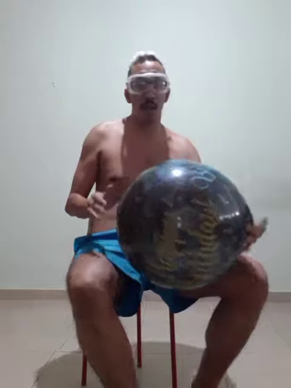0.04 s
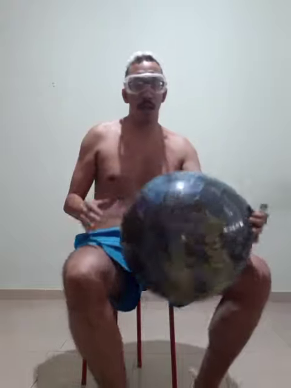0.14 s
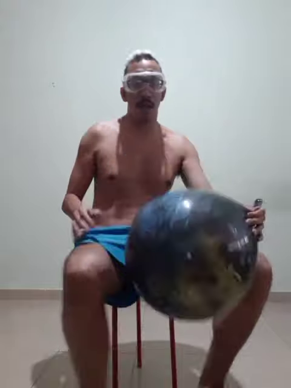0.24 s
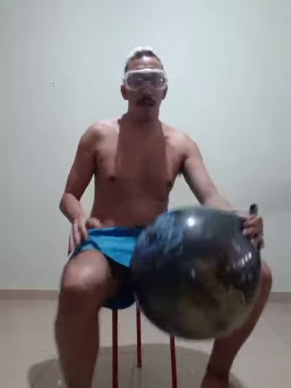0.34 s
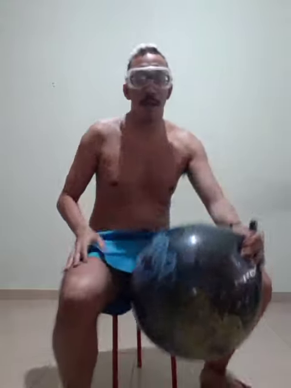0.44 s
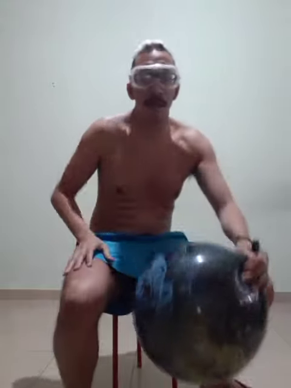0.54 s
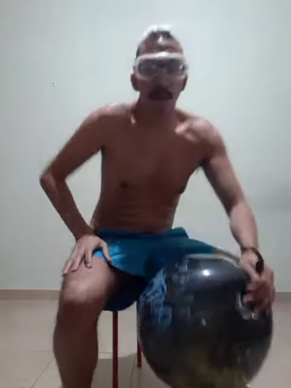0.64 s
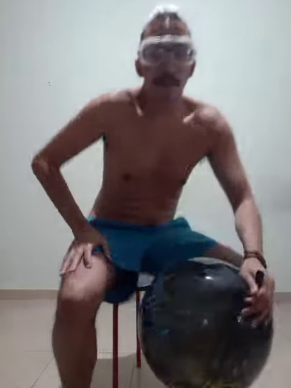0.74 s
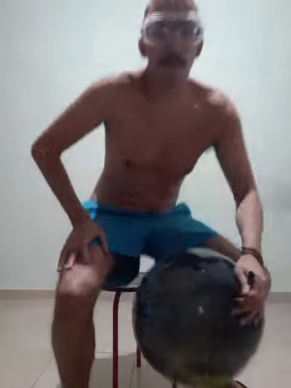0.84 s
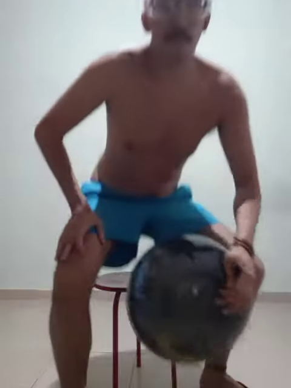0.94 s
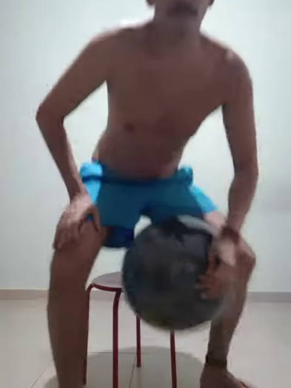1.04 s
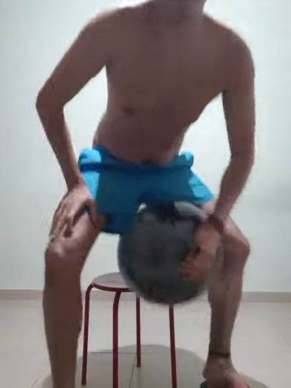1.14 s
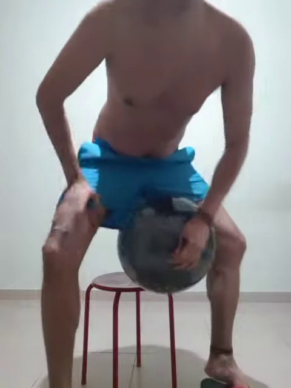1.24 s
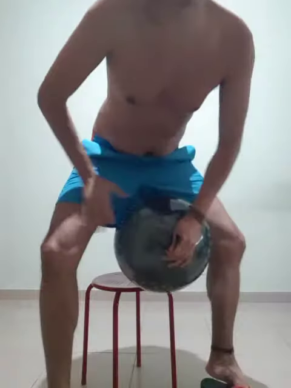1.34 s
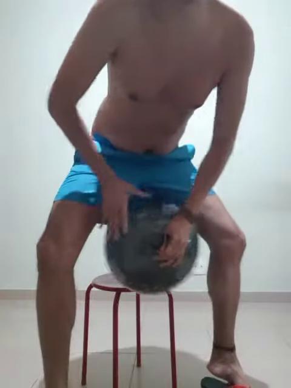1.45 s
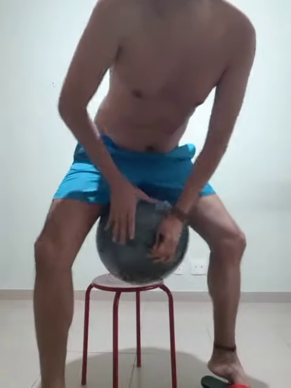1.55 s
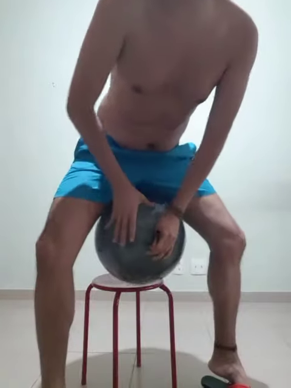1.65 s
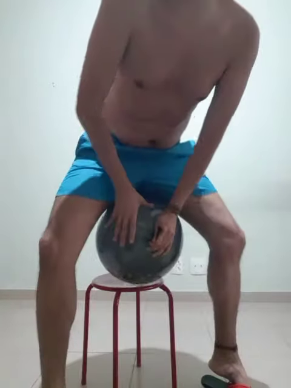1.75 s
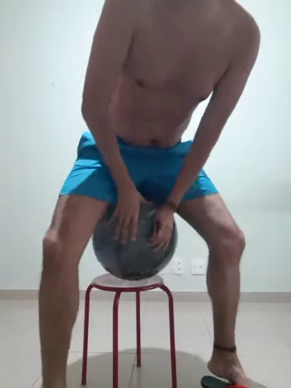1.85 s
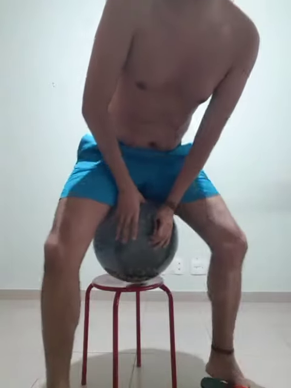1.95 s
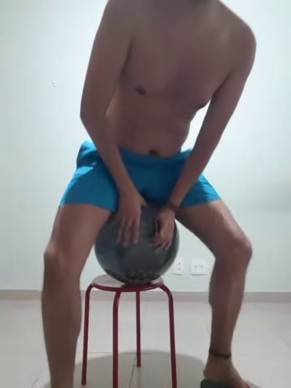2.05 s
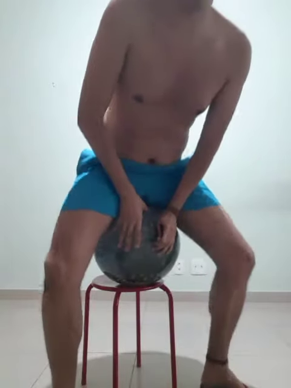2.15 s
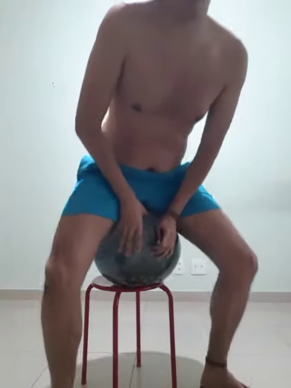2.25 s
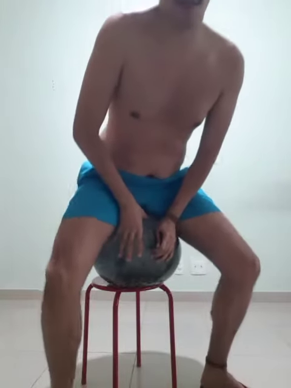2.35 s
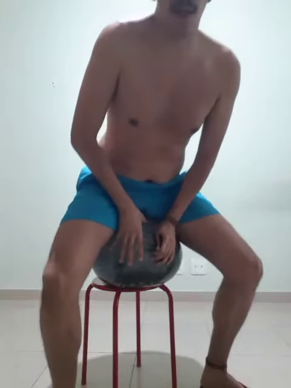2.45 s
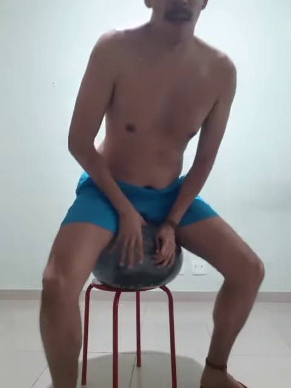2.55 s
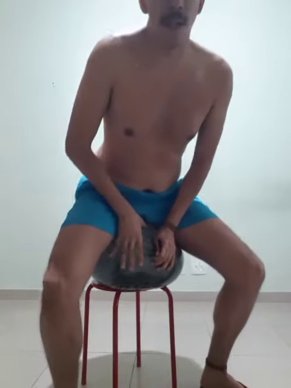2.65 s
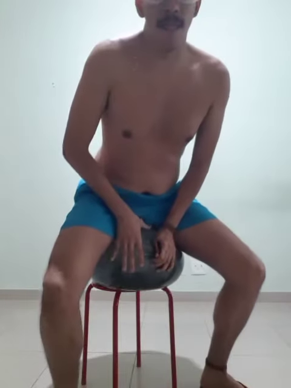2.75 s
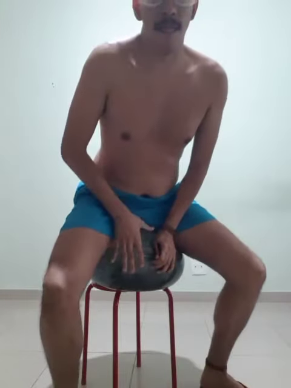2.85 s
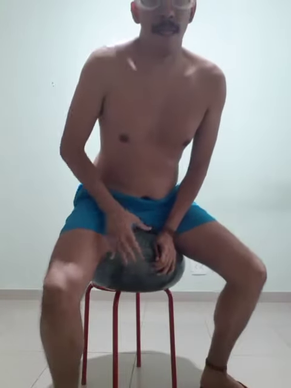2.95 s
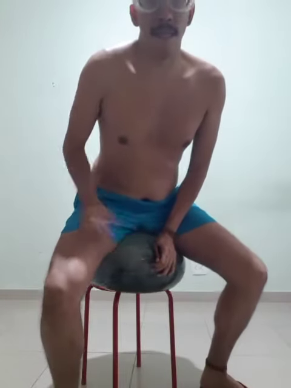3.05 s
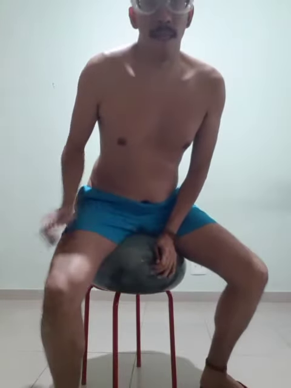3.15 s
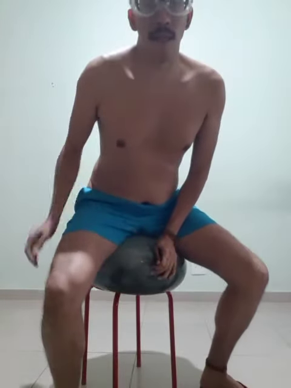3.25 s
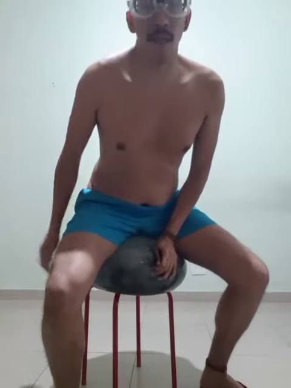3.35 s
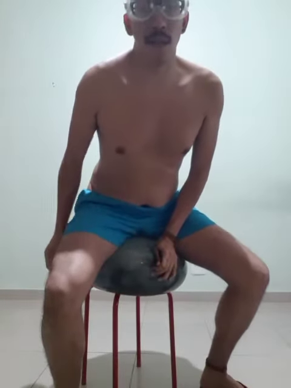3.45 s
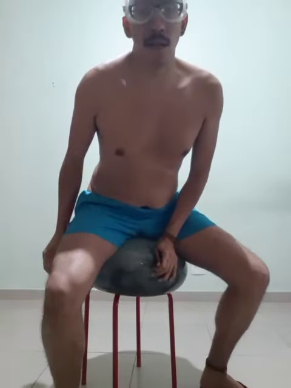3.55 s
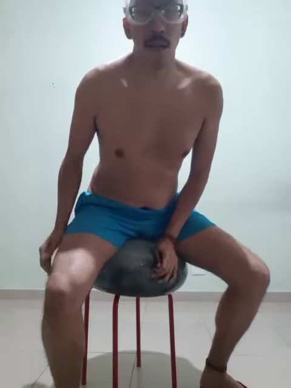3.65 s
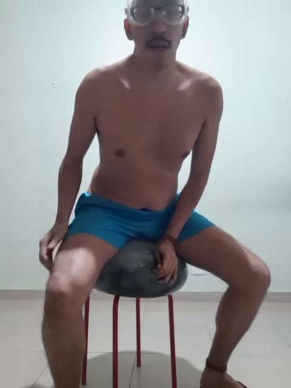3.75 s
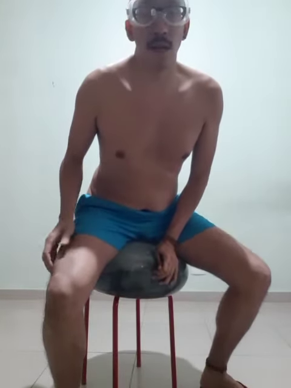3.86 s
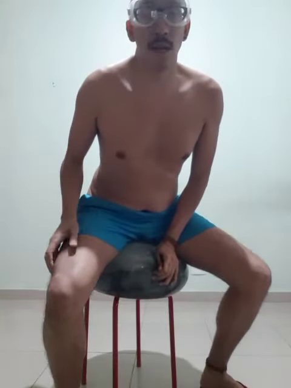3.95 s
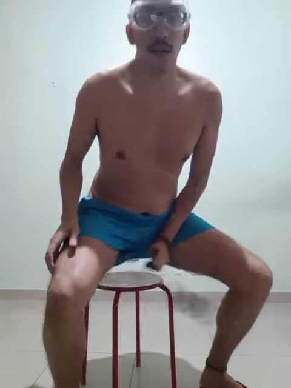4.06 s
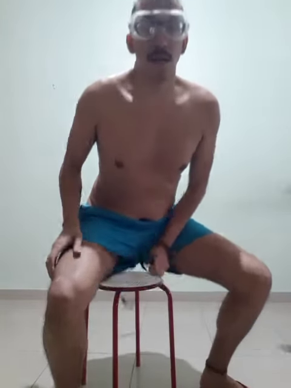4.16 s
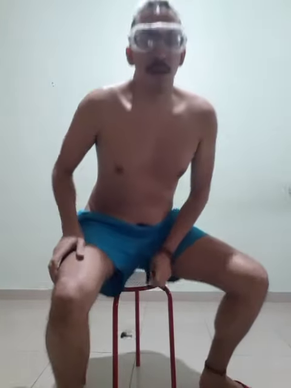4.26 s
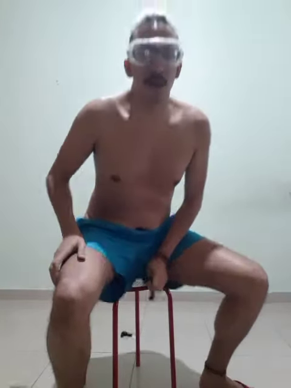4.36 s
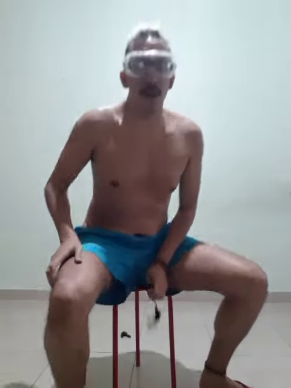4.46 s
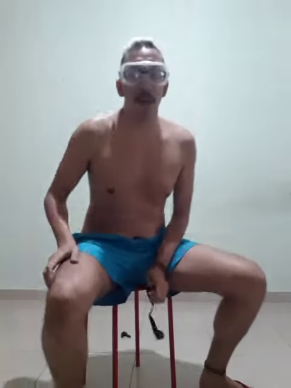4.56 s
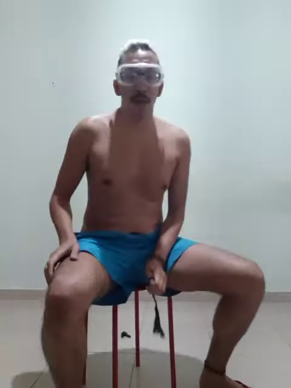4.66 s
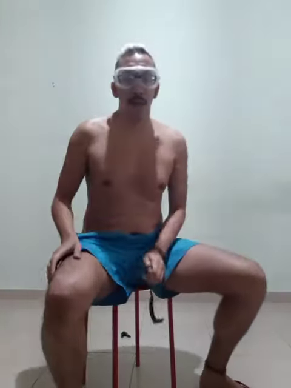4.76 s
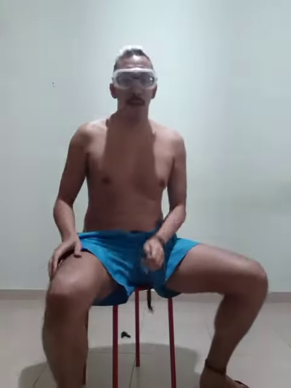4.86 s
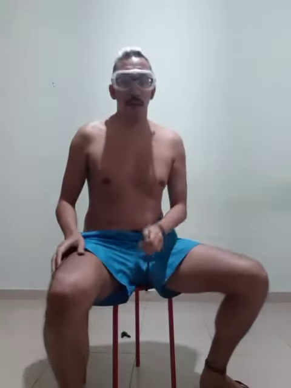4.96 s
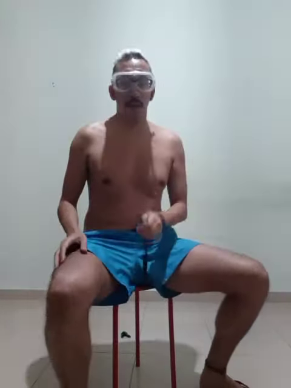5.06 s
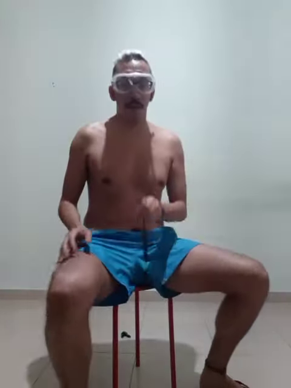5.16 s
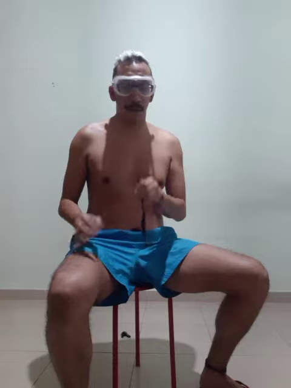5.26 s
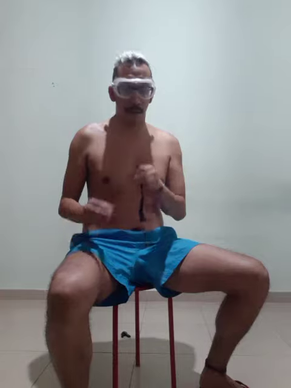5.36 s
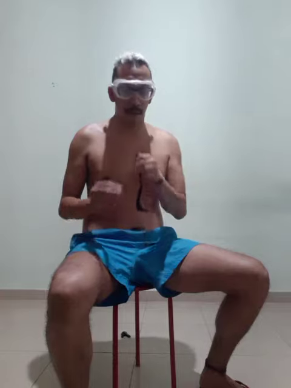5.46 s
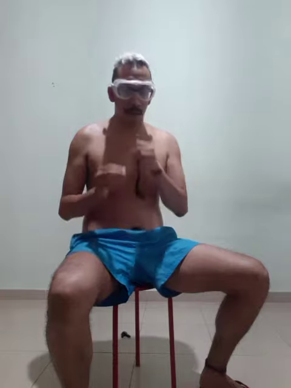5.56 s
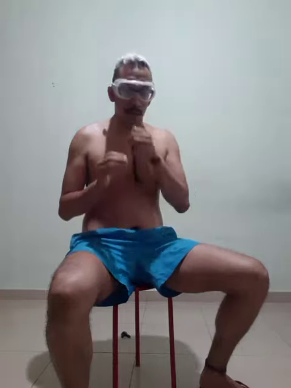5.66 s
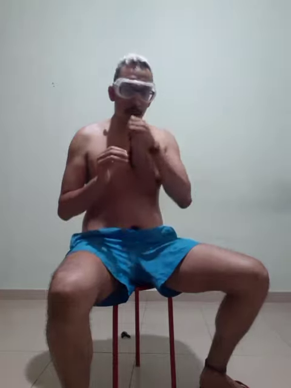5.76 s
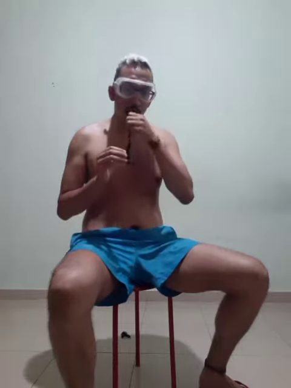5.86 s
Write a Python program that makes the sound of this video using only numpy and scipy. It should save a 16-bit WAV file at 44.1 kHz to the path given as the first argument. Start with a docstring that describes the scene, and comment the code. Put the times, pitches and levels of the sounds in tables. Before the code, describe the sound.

In a bare, echoing room, a big balloon is handled with hollow, ringing taps. Clothing slides over it and the rubber rasps and squeaks, growing louder before easing off. After a short lull comes a single slap on skin, then one sharp, loud bang as the balloon bursts. The microphone distorts on the pop, and only soft, dull room noise follows.

```python
"""A large latex balloon is tapped, pushed under a seated body and rubbed until it bursts.
Each tap excites the modes of its membrane and enclosed air; stick-slip friction makes it rasp and squeak.
Cloth hisses, a hand slaps skin, and a bare tiled room reverberates over soft air noise and a faint hum.
The burst overloads the recorder, whose gain stays low for over a second; a dull noise lingers after it."""
import sys
import numpy as np
from scipy import signal
from scipy.fft import rfft, irfft
from scipy.io import wavfile
from scipy.ndimage import uniform_filter1d

SR = 44100
rng = np.random.default_rng(int(sys.argv[2]) if len(sys.argv) > 2 else 0)


def bounce(signal):
    """Save signal as a 16-bit WAV file at the path given by the first command-line argument."""
    frames = np.transpose(np.atleast_2d(signal))
    limited = np.clip(frames, -1, 1)
    pcm = np.round(limited * 32767).astype(np.int16)
    wavfile.write(sys.argv[1], SR, pcm)


N = 260631

# Reverberation. Each row: frequency in Hz, time to decay by 60 dB in seconds.
ROOM_DECAY = [(60, 0.15), (200, 0.46), (600, 0.64), (2000, 0.63), (5000, 0.59), (9000, 0.49), (15000, .33)]
# Reflections from floor and walls. Each row: delay in ms, relative level in dB.
ECHOES = [(1.6, -7.5), (2.9, -3.5), (4.5, -14), (7.1, -10), (9.8, -18.5), (13, -11.5)]
# Likeness of the two channels in diffuse noise. Each row: frequency in Hz, correlation.
COHERENCE = [(30, 0.32), (100, 0.65), (300, 0.7), (600, 0.7), (900, 0.2), (1500, 0.), (15000, 0.)]
# Spectra of the sources. Each row: frequency in Hz, relative spectral density in dB.
AIR_SPECTRUM = [(15, -50.5), (25, -22.5), (59, -8), (119, -5), (209, -9.5), (305, -6), (1050, -7.5),
                (1620, -15), (1900, -12), (5270, -21), (6030, -19), (8330, -36), (15500, -34.5)]
DULL_SPECTRUM = [(120, -27.5), (300, -8.5), (550, -2), (900, -5), (1300, -13.5), (3000, -18), (15000, -33)]
CLOTH_SPECTRUM = [(500, -15.5), (2000, 0), (4000, 4), (6500, -2), (8000, -9.5), (11000, -5.5), (15500, -15)]
SKIN_SPECTRUM = [(80, -30), (200, -12), (500, -5), (1200, -6.5), (2500, -2.5), (4500, -2), (6500, -4.5),
                 (8000, -13), (15500, -22)]
FRICTION_SPECTRUM = [(60, -56.5), (110, -35), (200, -12), (500, -7), (900, -7.5), (1500, -9), (3400, -11),
                     (6500, -19), (8000, -25), (15500, -26.5)]
BURST_SPECTRUM = [(25, -61.5), (50, -43.5), (90, -14.5), (190, -2), (320, -6), (600, -2.5), (900, -8.5),
                  (1300, -10), (2100, -8.5), (3000, -3.5), (4500, -6), (6600, -12.5), (8200, -20),
                  (9500, -15.5), (15500, -17.5)]
# Envelope of the dull noise. Each row: time in seconds, level in dB.
DULL_ENVELOPE = [(4.6, -69.5), (4.7, -48), (5.25, -51), (5.55, -44.5), (5.91, -51)]
# Cloth sliding on skin and rubber. Each row: time of full level in seconds, level in dB, hold in seconds.
SLIDES = [(0., -53.5, .01), (0.177, -39.5, .01), (0.354, -48, 0.076), (0.678, -48, 0.071),
          (0.992, -54, 0.23), (1.271, -47, 0.027), (1.406, -44.5, 0.028), (1.556, -44, .04),
          (1.657, -39, 0.016), (1.795, -42, 0.29), (2.075, -36, 0.072), (2.338, -32.5, 0.082),
          (2.63, -45, .03), (3.058, -61, .02), (3.628, -53.5, 0.088)]
# Modes of the balloon. Each row: frequency in Hz, relative level in dB, 60 dB decay time in seconds.
BALLOON_MODES = [(178, -5, 0.19), (226, -5.5, 0.15), (368, -5, 0.12), (404, -2.5, 0.09), (495, 0, 0.1),
                 (792.3, 2.5, 0.12), (974, -7, .1), (1173, -4, .08), (1330, -11.5, 0.062),
                 (2368, -14.5, .06)]
# Taps on the balloon. Each row: time in seconds, level in dB, lowest mode's gain in dB,
# frequency of the membrane's swing in Hz.
TAPS = [(.1526, -8.5, -7.5, 1450), (0.342, -35, -7, 900), (.408, -33.5, -12, 694), (1.124, -37.5, 12, 397),
        (1.255, -40, 11, 400), (1.388, -34, -3, 590), (1.64, -43, 13, 400), (1.677, -18.5, -6, 910),
        (1.842, -16.5, -11, 1100), (2.093, -19, 2, 338), (2.115, -20.5, -9, 347), (3.551, -50.5, 16, 300),
        (3.68, -50.5, 16, 300), (3.808, -41.5, 6, 700)]
# Strokes over the rubber. Each row: start in seconds, level in dB, length in seconds, bass gain in dB,
# treble gain in dB, nominal slip rate in Hz (zero or less: no regular slips).
STROKES = [(0.181, -52.5, 0.23, -5.5, -6, -5), (0.362, -55, 0.12, -2.5, 4, 0),
           (0.779, -66, 0.16, 2, 4, 339.5), (0.976, -64, 0.075, -5, 19, 344.5),
           (1.248, -55, 0.12, 3.5, 13, 400.5), (1.387, -50, 0.12, 3, 15, 412),
           (1.542, -45, 0.19, 6.5, 14, 0.5), (1.662, -52.5, 0.22, 6.5, 8, 401),
           (1.85, -44.5, 0.17, 5.5, -24, -1), (1.995, -39.5, 0.067, 2, 4.5, -1.5),
           (2.082, -33, 0.076, -2.5, -1.5, 0), (2.292, -35, 0.13, -1, -14, 815),
           (2.4, -34.5, 0.092, -4.5, -8.5, 804), (2.598, -33, 0.085, -8.5, -16, 521.5),
           (2.7, -39.5, 0.05, -4.5, -10, 1039), (3.032, -69.5, 0.07, 5, -8, 299),
           (3.699, -63, 0.24, 2, 5, 3.5)]


def gain_of(db):
    """Amplitude grows tenfold for every 20 dB."""
    return 10 ** (np.asarray(db) / 20)


def unit_rms(x):
    """Normalisation to a mean power of one."""
    return x / np.sqrt(np.mean(x ** 2) + 1e-20)


def curve_at(points, hz):
    """Interpolation on a logarithmic frequency axis."""
    knots_hz, values = np.transpose(points)
    return np.interp(np.log(hz + 1), np.log(knots_hz + 1), values)


def add(mix, start_s, sound):
    """Superposition: a sound adds to the mix from its start time."""
    part = mix[round(start_s * SR):][:len(sound)]
    part += sound[:len(part)]


def pulse(spectrum, bass_db=0., treble_db=0.):
    """Minimum phase gives the most compact causal pulse of a shelved spectrum; its energy is one."""
    hz = np.fft.rfftfreq(4096, 1 / SR)
    db = curve_at(spectrum, hz)
    db += bass_db / (1 + (hz / 1100) ** 4) + treble_db / (1 + (6500 / (hz + 1)) ** 4)
    log_gain = np.log(gain_of(np.maximum(db - db.max(), -90)))
    mirrored = np.r_[log_gain, log_gain[-2:0:-1]]
    response = np.fft.ifft(np.exp(np.conj(signal.hilbert(mirrored)))).real[:2048]
    return response / np.linalg.norm(response)


def crack(start_s, db, spectrum, spread_ms):
    """Dispersion: a pressure front whose treble arrives a little after its bass."""
    hz = np.fft.rfftfreq(4096, 1 / SR)
    dispersion = np.exp(-2j * np.pi * spread_ms / 1000 * hz ** 2 / SR)
    out = np.zeros(N)
    add(out, start_s, gain_of(db) * irfft(rfft(pulse(spectrum), 4096) * dispersion))
    return out


def diffuse_noise(length, magnitude, size):
    """A diffuse field is alike at two points only in the bass; magnitude(Hz, s) shapes the noise."""
    frames, hz = 4 * length // size + 5, np.fft.rfftfreq(size, 1 / SR)
    a, b, c, d = rng.standard_normal((frames, len(hz), 4)).T
    coherence = curve_at(COHERENCE, hz)[:, None]
    left = a + 1j * b
    right = coherence * left + np.sqrt(1 - coherence ** 2) * (c + 1j * d)
    spectra = np.array([left, right]) * magnitude(hz[:, None], np.arange(frames) * size / 4 / SR)
    return signal.istft(spectra, nperseg=size, noverlap=3 * size // 4)[1][:, :length]


def room(x, tail_db, echo_db):
    """Reverberation: direct sound, early reflections and an exponential tail, longest in the midrange."""
    tail = diffuse_noise(SR, lambda hz, s: gain_of(-60 * s / curve_at(ROOM_DECAY, hz)), size=256)
    tail *= 1 - np.exp(-np.arange(SR) / (0.005 * SR))  # the tail takes some milliseconds to fill
    response = gain_of(tail_db) * tail / np.linalg.norm(tail[0])
    response[:, 0] += 1
    for ms, db in ECHOES:
        delays = (ms * SR / 1000 * rng.uniform(.93, 1.07, 2)).astype(int)
        response[[0, 1], delays] += gain_of(db + echo_db)
    return signal.fftconvolve(x[None], response, axes=1)[:, :N]


def room_tone():
    """Spectral modulation: soft air noise swells and sinks in patches of frequency and time."""
    patches = uniform_filter1d(rng.standard_normal((513, N // 256 + 9)), 10, axis=0)
    drift_db = 2.2 * unit_rms(uniform_filter1d(patches, 14, axis=1))
    air = diffuse_noise(N, lambda hz, s: gain_of(curve_at(AIR_SPECTRUM, hz) + drift_db[:, :len(s)]), 1024)
    return gain_of(-53.5) * unit_rms(air)


def hum(start_s=2.6, end_s=3.65, fade_s=.11):
    """A faint pure tone glides upward; its phase is the integral of its frequency."""
    t = np.arange(N) / SR
    fade = np.clip(np.minimum(t - start_s, end_s - t) / fade_s, 0, 1)
    hz = np.interp(t, (start_s, end_s), (115.5, 119.5))
    db = np.interp(t, (start_s, end_s), (-65, -62))
    return np.sqrt(2) * fade * gain_of(db) * np.sin(2 * np.pi * np.cumsum(hz) / SR)


def rustle(envelope, spectrum):
    """Amplitude modulation: diffuse noise flickers finely and follows an envelope."""
    def flickering(hz, s):
        return gain_of(curve_at(spectrum, hz) + rng.standard_normal(len(s)))
    return unit_rms(diffuse_noise(N, flickering, size=256)) * envelope


def dull_noise():
    """Band-limited noise, strongest in the low midrange, lingers after the burst."""
    times, db = np.transpose(DULL_ENVELOPE)
    return rustle(gain_of(np.interp(np.arange(N) / SR, times, db, left=-120)), DULL_SPECTRUM)


def cloth(swell_db_per_s=180, fade_db_per_s=93.5):
    """Sliding friction: each hiss swells, holds and fades; being incoherent, the slides add in power."""
    t = np.arange(0, N, 64) / SR
    peak_s, peak_db, hold_s = np.transpose(SLIDES)[:, :, None]
    db = peak_db - swell_db_per_s * np.maximum(peak_s - t, 0)
    db -= fade_db_per_s * np.maximum(t - peak_s - hold_s, 0)
    envelope = np.linalg.norm(gain_of(db), axis=0)
    return rustle(np.interp(np.arange(N) / SR, t, envelope), CLOTH_SPECTRUM)


def tick(start_s=3.181, hz=6000, db=-47, t60=.012):
    """A damped oscillation, high and brief, is heard as one small tick."""
    t = np.arange(SR // 20) / SR
    out = np.zeros(N)
    add(out, start_s, gain_of(db - 60 * t / t60) * np.sin(2 * np.pi * hz * t))
    return out


def slap():
    """Impact: a hand meeting skin radiates one bright pressure pulse."""
    return crack(start_s=3.4668, db=-7.5, spectrum=SKIN_SPECTRUM, spread_ms=1.3)


def balloon_ring(lowest_db=0.):
    """Normal modes of the membrane and enclosed air decay freely; a broad contact favours the lowest."""
    t = np.arange(SR // 2) / SR
    modes = [gain_of(db - 60 * t / t60) * np.sin(2 * np.pi * hz * t) for hz, db, t60 in BALLOON_MODES]
    return (gain_of(lowest_db) * modes[0] + sum(modes[1:])) / abs(sum(modes)).max()


def balloon_taps():
    """Impulse excitation: a faint first touch, one swing of the membrane in and out, then free ringing."""
    out = np.zeros(N)
    for time_s, db, lowest_db, swing_hz in TAPS:
        phase = np.arange(-60, 200) * 2 * np.pi * swing_hz / SR
        swing = -phase * np.exp(.5 - phase ** 2 / 2)
        ring_db = -.5 - 2 * np.log2(swing_hz / 400.3)  # a slow, soft swing leaves more ring
        add(out, time_s - .0013, gain_of(db - 5.5) * pulse(SKIN_SPECTRUM))
        add(out, time_s - 60 / SR, gain_of(db) * swing)
        add(out, time_s, gain_of(db + ring_db) * balloon_ring(lowest_db))
    return out


def balloon_strokes(squeak_share=.1, rate_wobble=.018):
    """Stick-slip friction drives the modes: near-periodic slips squeak, scattered ones rasp."""
    out = np.zeros(N)
    ring = balloon_ring()
    ring /= np.linalg.norm(ring)
    for start_s, db, length_s, bass_db, treble_db, slip_hz in STROKES:
        count = round(length_s * SR)
        wobble = unit_rms(uniform_filter1d(rng.standard_normal(count), 300))
        speed = 1 - .3 * np.exp(-np.arange(count) / (.012 * SR))  # slips quicken as the hand gets moving
        cycles = np.cumsum(slip_hz * (speed + rate_wobble * wobble)) / SR
        slips = sum(np.cos(2 * np.pi * k * cycles) / k ** 0.66 for k in range(1, 9))
        grit = rng.standard_normal(count) * gain_of(3 * rng.exponential(1, count))
        share = squeak_share if slip_hz > 0 else 0
        friction = np.sqrt(share) * unit_rms(slips) + np.sqrt(1 - share) * unit_rms(grit)
        pressure = np.sin(np.pi * np.linspace(0, 1, count) ** 0.7) ** 1.3 * gain_of(2 * wobble)
        force = gain_of(db) * friction * pressure
        rasp = signal.oaconvolve(force, pulse(FRICTION_SPECTRUM, bass_db, treble_db))
        boom = signal.oaconvolve(force, ring) * gain_of(bass_db - 18)
        add(out, start_s, rasp)
        add(out, start_s, boom)
    return out


def balloon_burst():
    """Sudden release of pressure: the tearing balloon sends out one steep broadband front."""
    return crack(start_s=3.976, db=46, spectrum=BURST_SPECTRUM, spread_ms=1.5)


def scene():
    """Superposition: the balloon and the slap excite the room, and the diffuse noises add to them."""
    bass_loss = signal.butter(4, 135, "high", fs=SR, output="sos")  # a small body radiates no deep bass
    tapped, rubbed = signal.sosfilt(bass_loss, [balloon_taps() + tick(), balloon_strokes()])
    events = room(tapped, tail_db=-1.5, echo_db=-5)
    events += room(rubbed, tail_db=8.3, echo_db=0)
    events += room(slap(), tail_db=13.08, echo_db=0.64)
    events += room(balloon_burst(), tail_db=23, echo_db=5)  # the seated body shields the direct bang
    balance = gain_of([[.3], [-.3]])
    return events * balance + cloth() + dull_noise() + room_tone() + hum()


def record(dry):
    """Compression: gain control drops, holds and recovers; a limiter and soft clipping catch the rest."""
    cut_db, hold_s, recovery_db_per_s = 27, .9, 30  # slow gain control
    threshold_db, attack_s, release_db_per_s = -12.5, .0003, 150  # quick limiter
    t = np.arange(N) / SR
    power_db = 10 * np.log10(abs(uniform_filter1d((dry ** 2).mean(0), 256)) + 1e-12)
    last_overload_s = np.maximum.accumulate(np.where(power_db > 0, t, -10))
    slow_db = np.clip(cut_db - recovery_db_per_s * (t - last_overload_s - hold_s), 0, cut_db)
    release_db = release_db_per_s * t
    held_db = np.maximum.accumulate(power_db - slow_db + release_db) - release_db
    quick_db = 0.73 * np.maximum(held_db - threshold_db, 0)
    lag = np.exp(-1 / (attack_s * SR))
    compressed = dry / gain_of(signal.lfilter([1 - lag], [1, -lag], slow_db + quick_db))
    clipped = compressed / (0.5 + abs(compressed) ** 6) ** (1 / 6)
    bass_cut = signal.butter(2, 38, "high", fs=SR, output="sos")
    treble_cut = signal.firwin(511, 15612, window=("kaiser", 9), fs=SR)
    return signal.oaconvolve(signal.sosfilt(bass_cut, clipped), treble_cut[None], "same")


dry = scene()
out = record(dry)
bounce(out)
```